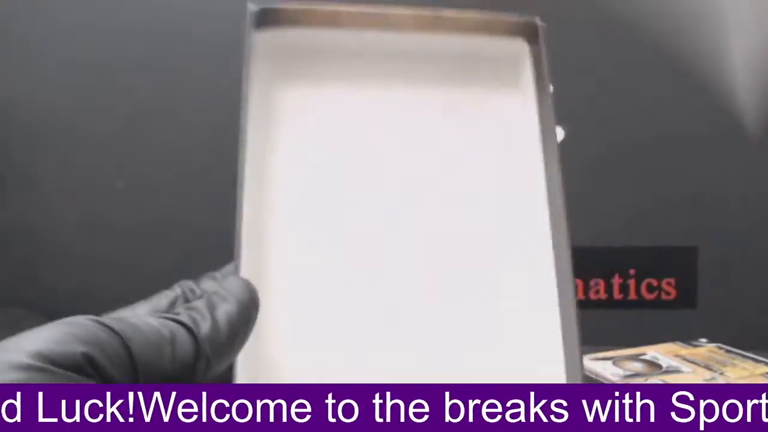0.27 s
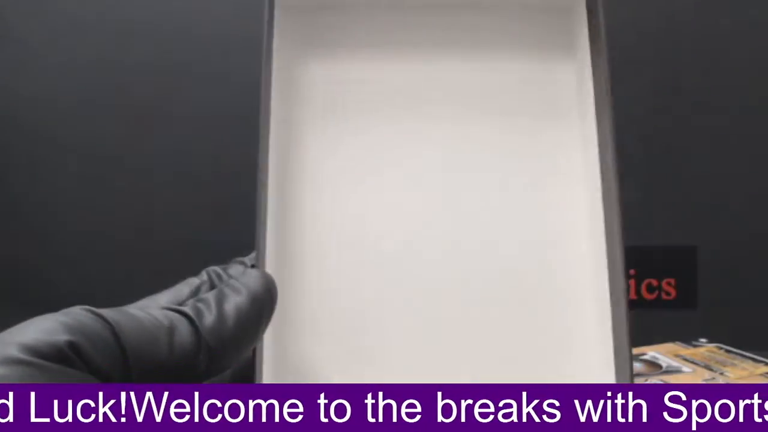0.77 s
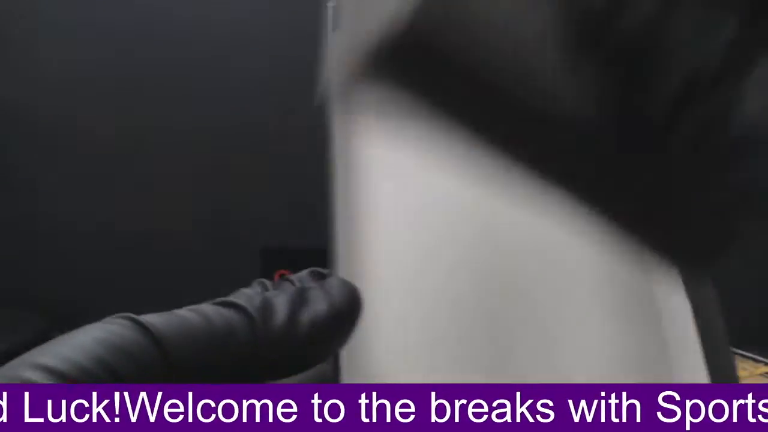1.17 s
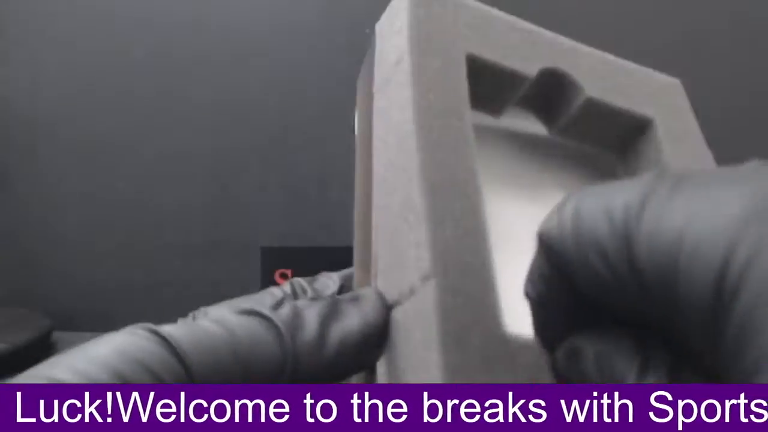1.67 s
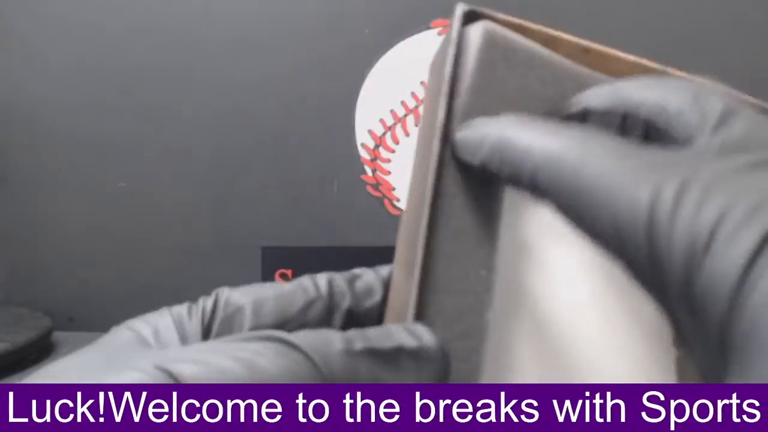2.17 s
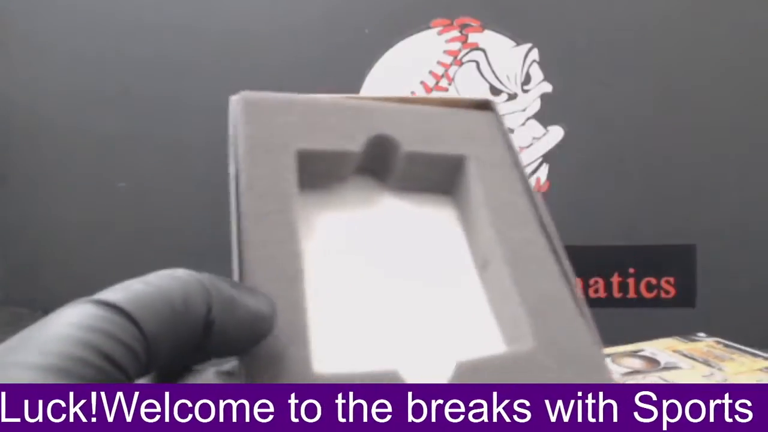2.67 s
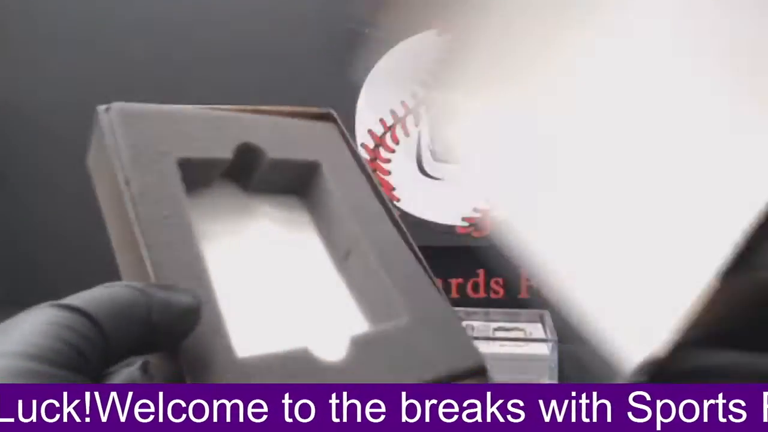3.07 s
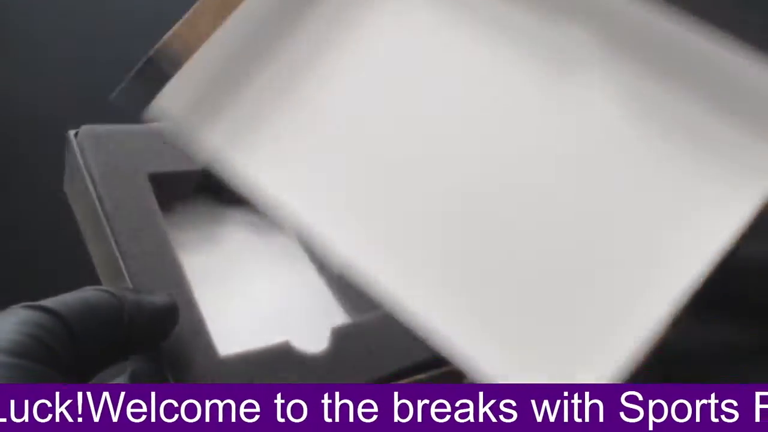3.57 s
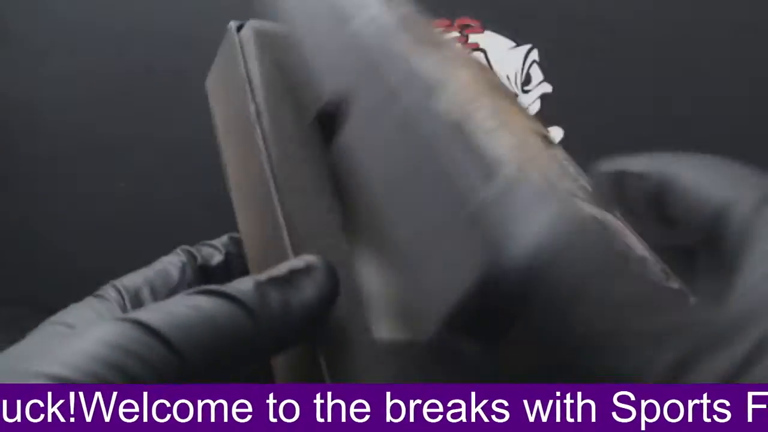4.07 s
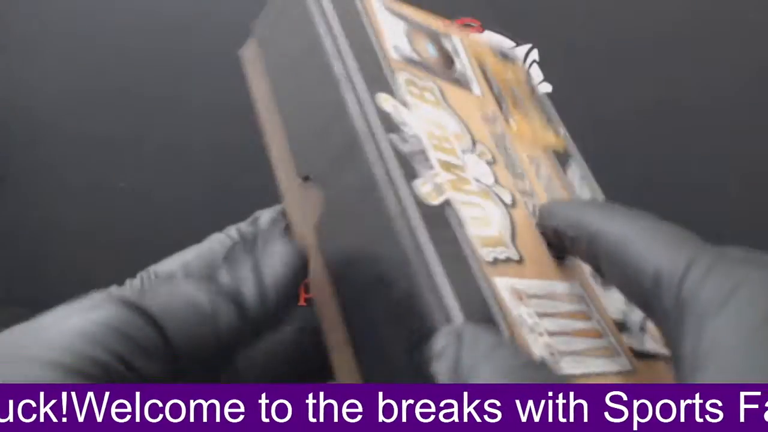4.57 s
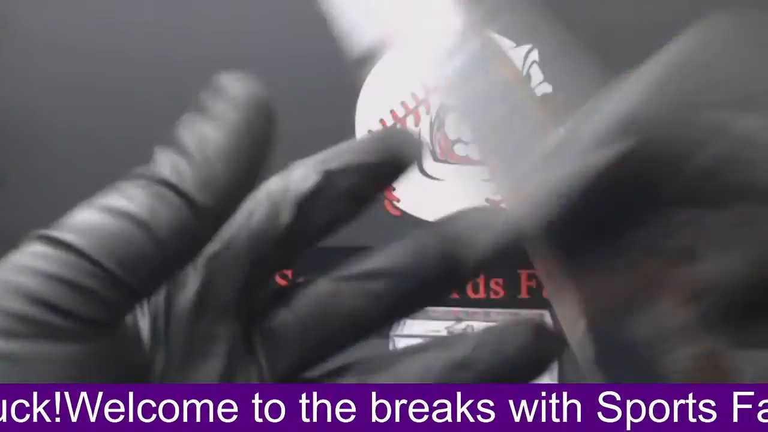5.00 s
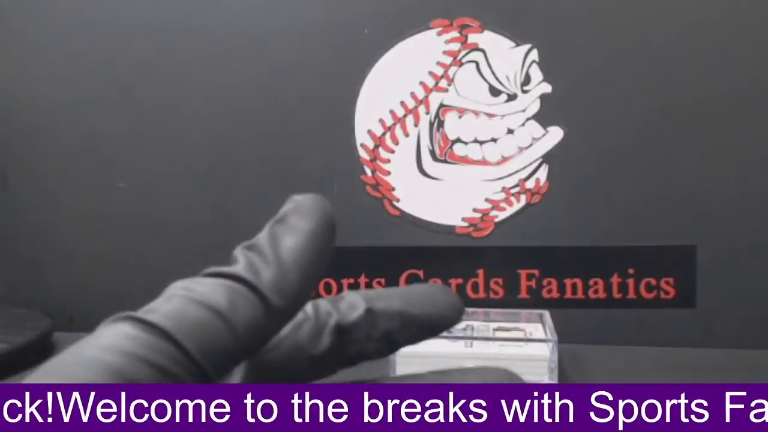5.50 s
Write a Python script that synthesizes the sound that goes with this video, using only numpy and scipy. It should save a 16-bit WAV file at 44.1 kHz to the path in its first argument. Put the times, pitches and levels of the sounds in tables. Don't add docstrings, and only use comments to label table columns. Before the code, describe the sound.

Dry foam and cardboard friction starts at once, fades to faint hum, then returns with a small squeak, clicks and boxy thuds. A lid is dragged and brought over with a sharp scrape and soft bumps. It slaps hard onto the box, rattles, rubs and is forced down with low shuddering thumps, then almost silence. Close microphone, small room, louder on the left.

```python
import sys
import numpy as np
from scipy import signal
from scipy.fft import rfft, irfft, next_fast_len
from scipy.io import wavfile
from scipy.ndimage import uniform_filter1d, map_coordinates

SR = 44100
rng = np.random.default_rng(int(sys.argv[2]) if len(sys.argv) > 2 else 0)


def log_audio(samples):
    frames = np.atleast_2d(samples).T
    limited = np.clip(frames, -1, 1)
    pcm = np.round(limited * 32767).astype(np.int16)
    wavfile.write(sys.argv[1], SR, pcm)


def nominal_scale(level):
    x = np.asarray(level, float) / 20
    return 10 ** x


N = 253126
T = np.arange(N) / SR
LID_ON_S = 3.885

# centre_hz, width_hz, level_db
OPEN_CAVITY = [(200, 104, -7.5), (282, 34.8, 3.5), (382.3, 40, -4.5), (463.68, 76, -13)]
# centre_hz, width_hz, level_db
SHUT_CAVITY = [(221, 13, 4.5), (291, 47, 5), (335, 71.1, 5), (395.88, 41.6, 0.5), (447.7, 23.4, 3),
               (534, 117, -15.5)]


def unit(x):
    return x / np.sqrt(np.mean(x ** 2) + 1e-20)


def along(points, hz):
    f, v = np.transpose(points)
    return np.interp(np.log(hz + 1), np.log(f + 1), v)


def wobble(rate_hz):
    knots = rng.standard_normal(int(N / SR * 200) + 4)
    return map_coordinates(knots, [T * min(rate_hz, 199)])


def filtered(x, response):
    m = next_fast_len(N + SR // 2)
    return irfft(rfft(x, m) * response(np.fft.rfftfreq(m, 1 / SR)), m)[..., :N]


def modes(table):
    def response(f):
        total = 0
        for k, (centre_hz, width_hz, db) in enumerate(table):
            loss = 1j * f * width_hz
            total = total + (-1) ** k * nominal_scale(db) * loss / (centre_hz * centre_hz - f * f + loss)
        return total
    return response


def grains(rate_hz, spread_db, smooth):
    size = nominal_scale(spread_db * np.minimum(rng.exponential(size=N), 3))
    slips = (rng.random(N) < rate_hz / SR) * rng.standard_normal(N) * size
    share = np.clip(smooth, 0, 1)
    return np.sqrt(1 - share) * unit(slips) + np.sqrt(share) * rng.standard_normal(N)


def rung(table, envelope, force):
    response = modes(table)
    gain = np.sqrt(np.mean(np.abs(response(np.linspace(1, SR / 2, num=8192))) ** 2))
    return filtered(envelope * force, response) / gain


def struck(table, blows):
    one = irfft(modes(table)(np.fft.rfftfreq(16384, 1 / SR)))
    return signal.fftconvolve(blows, one[:8192] / np.abs(one).max())[:N]


def stages():
    drag_s, up_s = 2.65, 3.1
    # centre_hz, width_hz, level_db
    tray = [(689, 107, -7), (955, 64, 3.5), (1400, 98, -11.5)]
    # centre_hz, width_hz, level_db
    corner = [(690, 60.2, 1), (940, 52, 2.5), (1320, 59, -5), (2050, 120, -17)]
    # centre_hz, width_hz, level_db
    panel = [(715, 20.7, 3.5), (909, 33, 3.5), (1200, 24, -8), (1471.1, 29, -5), (1930, 29, -6.5),
             (2100, 39, -18.5), (2470, 35, -10.5), (3130, 35, -11)]
    # centre_hz, width_hz, level_db
    shut = [(626, 120, -8.5), (741, 57, -0.5), (915, 48, -3), (995, 70, -3), (1214, 110, -10),
            (1430, 120, -12.5), (2000, 490, -17.5)]
    return ((tray, T < drag_s), (corner, (T >= drag_s) & (T < up_s)),
            (panel, (T >= up_s) & (T < LID_ON_S)), (shut, T >= LID_ON_S))


def strokes(table, db, slower=1):
    rounded = 1.24
    peak_s, rise_s, fall_s = np.transpose(table)[:3, :, None]
    t = np.arange(0, N / SR, 0.001)
    away = np.where(t < peak_s, (peak_s - t) / np.abs(rise_s), (t - peak_s) / np.abs(fall_s)) / slower
    return np.interp(T, t, np.linalg.norm(nominal_scale(db[:, None] - 10 * away ** rounded), axis=0))


def sliding(table, db):
    touch_s, lift_s = 0.0078, 0.0099
    start_s, length_s, _, gain_db = np.transpose(table)[:4, :, None]
    t = np.arange(0, N / SR, 0.001)
    edges = np.maximum(start_s - t, 0) / touch_s + np.maximum(t - start_s - length_s, 0) / lift_s
    swell_db = gain_db * np.clip((t - start_s) / length_s, 0, 1)
    return np.interp(T, t, np.linalg.norm(nominal_scale(db[:, None] + swell_db - 10 * edges), axis=0))


def patchy(x, patchy_db, colour):
    hz, s, z = signal.stft(x, SR, nperseg=512)
    field = uniform_filter1d(uniform_filter1d(rng.standard_normal(z.shape), 5, 0), 7, 1)
    z = z * colour(hz[:, None], s) * nominal_scale(patchy_db * unit(field))
    return unit(signal.istft(z, SR, nperseg=512)[1][:N])


def room_tone():
    # freq_hz, level_db
    quiet = [(12, -35.5), (20, 5), (89, -12.5), (124, -11), (253, -28.5), (370, -22.5), (502, -32.5),
             (541, -32), (1570, -35), (2080, -49.5), (7770, -49.5), (8600, -40), (11200, -86.5),
             (18900, -120)]
    # freq_hz, level_db
    hum_tones = [(26.9, -66), (118.4, -63.5), (376.8, -84), (1200, -91.5), (1599, -89.5), (1798, -89),
                 (3198, -98.5), (6998, -97), (7499, -100), (8000, -92)]
    quiet_db = -53
    air = filtered(rng.standard_normal((2, N)), lambda hz: nominal_scale(along(quiet, hz)))
    air = unit(air[0]) + [[0.33], [-0.33]] * unit(air[1])
    swell, drift = wobble(3.0), wobble(17)
    hum = np.zeros(N)
    for hz, db in hum_tones:
        hum += nominal_scale(db + 5.0 + 0.31 * swell) * np.sin(2 * np.pi * hz * T + 0.4 * drift)
    return (nominal_scale(quiet_db - 3.0 + 0.28 * wobble(2.1)) * air + hum) * nominal_scale([[3.2], [-3.8]])


def surface():
    # start_s, length_s, hiss_db, gain_by_lift_db, scrape_rel_db
    foam_slides = [(0, 0.1926, -57, -2, 5.5), (0.215, 0.025, -54.5, -5.5, 6.5), (0.25, 0.15, -72, -7.5, 1),
                   (0.957, .19, -80, 15, 1.5), (1.111, 0.2, -71, -16, 8.5), (1.43, 0.062, -66, -12, 2.5),
                   (1.512, 0.074, -77, 10.5, 10), (1.773, 0.14, -55, -6.5, 6), (1.944, 0.11, -69.5, 2.5, 7),
                   (2.074, 0.095, -61, 7, 7), (2.176, 0.077, -70, 1.5, 9.5), (2.29, 0.0897, -71.5, 13.5, 7),
                   (2.39, 0.44, -74, -4, -1)]
    # start_s, length_s, hiss_db, gain_by_lift_db, scrape_rel_db
    lid_slides = [(2.797, 0.074, -70.5, 0.5, 15), (2.9, 0.16, -74.5, 9.5, -1.5),
                  (3.036, 0.069, -60, -11.5, -3), (3.152, 0.067, -61, -2, 12), (3.215, .022, -66, -2, 14.5),
                  (3.25, 0.074, -74.5, -6, 9), (3.62, 0.05486, -76, 3.5, 1.5),
                  (3.73, 0.08087, -73, 4, -1.5), (3.906, 0.0869, -67.5, -5.5, 12),
                  (3.999, 0.11089, -62, 7.5, 9.5), (4.12, 0.075, -59, -4.5, 9), (4.197, 0.063, -52, -18, 1),
                  (4.274, 0.08219, -65.5, 12, 11.5), (4.35, 0.058, -52.5, -3, 4.5),
                  (4.42, 0.062, -51.5, 4, 2.5), (4.498, 0.18, -58.5, 2.5, 9.5), (4.668, 0.15, -50.5, 7, -2),
                  (4.839, 0.0637, -54.5, -16.5, -8), (4.91, 0.63746, -74.5, -1.5, 1.5),
                  (5.616, 0.10404, -84.5, -7.5, 16)]
    # time_s, freq_hz
    contact = [(.1, 2130), (.19, 2200), (.225, 3070), (.4, 1710), (1.13, 2978), (1.3, 2050), (2.84, 2200),
               (3.18, 1696), (3.7, 2764), (4.0, 1900), (4.11, 3036), (4.34, 1900), (4.5, 2190), (5.7, 1660)]
    # freq_hz, level_db
    scuff = [(1760, -33.5), (3000, -6), (4120, -2), (4520, -7), (5940, -3.5), (7180, -8.5), (8600, -40),
             (11200, -59), (18900, -120)]
    # freq_hz, level_db
    scrape = [(900, -28.5), (1400, -7.5), (2100, -5), (3300, -6.5), (4500, -11.5), (7000, -23)]
    rest_hiss_db = -86.5

    slides = np.array(foam_slides + lid_slides)
    fine_gain = np.hypot(sliding(slides, slides[:, 2]), nominal_scale(rest_hiss_db))
    coarse_gain = np.hypot(sliding(slides, slides[:, 2] + slides[:, -1]), nominal_scale(rest_hiss_db + 5.5))
    contact_s, contact_hz = np.transpose(contact)

    def scrape_colour(hz, s):
        off = (hz - np.interp(s, contact_s, contact_hz)) / 180
        return nominal_scale(along(scrape, hz) + 6.2 / (1 + off ** 2))

    fine = patchy(grains(3000, spread_db=1.5, smooth=0.43), 2.8, lambda hz, s: nominal_scale(along(scuff, hz)))
    coarse = patchy(grains(1500, spread_db=0.0, smooth=0.47), 1.9, scrape_colour)
    grip = nominal_scale(2.0 * wobble(35))
    return grip * (nominal_scale(0.5) * fine_gain * fine + nominal_scale(0.56 * wobble(60)) * coarse_gain * coarse)


def rubbing():
    # peak_s, rise_s_per_10db, fall_s_per_10db, board_db, cavity_db
    foam_presses = [(.05, 0.3, 0.05, -57, -48), (.14, 0, .045, -54.5, -54.5),
                    (0.227, 0.2044, 0.02, -50.5, -53), (.98, -0.6, 0.7, -77, -75),
                    (1.09, -0.3, 0.7, -65, -61.5), (1.459, 0, 0.015, -57.5, -39),
                    (1.582, 0, 0.03, -56.5, -56.5), (1.775, -0.01, 0, -38.5, -42.5),
                    (1.9, 0.06, 0.25, -54, -52.5), (2.149, 0.006, -0.02, -46.5, -40.5),
                    (2.383, 0.12, -0.08, -51, -48.5)]
    # peak_s, rise_s_per_10db, fall_s_per_10db, board_db, cavity_db
    lid_presses = [(2.708, 0.01501, 0.024, -52, -56), (2.829, 0.028, 0.036, -42.5, -48),
                   (3.034, 0.012, 0.029, -52.5, -47.5), (3.19, 0.025, 0.029, -28.5, -39.5),
                   (3.3, 0.044, .07, -62, -54), (4.043, 0.0037, 0.077, -40.5, -38.5),
                   (4.129, .05, .03, -46, -40.5), (4.201, 0.019, 0.04833, -42, -43.5),
                   (4.301, 0.023, 0.12496, -44, -51.5), (4.501, 0.17, 0.34, -45.5, -48.5),
                   (4.635, 0.021, 0.051, -39.5, -31), (4.713, 0.054, 0.079, -35.5, -30),
                   (4.81, 0.11, 0.02427, -34.5, -30.5), (5.08, 0.076, 0.07996, -55.5, -51),
                   (5.616, .02, 0.037, -80, -55)]
    # peak_s, rise_s_per_10db, fall_s_per_10db, shake_db
    leans = [
        (1.45, -0.3, 0.6, -57.5),
        (2.164, 0, 0.1, -48),
        (2.72, 0.24, 0.4, -54),
        (3.7, 0.5, 1, -61),
        (4.045, 0, -0.77, -39.5),
        (4.372, 0.02, 0.72, -44.5),
        (4.694, 0.0464, 0.09, -28),
        (4.829, 0.03, 0.0647, -32),
    ]
    # centre_hz, width_hz, level_db
    desk = [(66, 28, -12), (149.4, 25.6, 2), (176.98, 42.7, -2.5)]
    rest_board_db, rest_cavity_db = -83.5, -65.5
    air_lingers = 1.45

    presses = np.array(foam_presses + lid_presses)
    board_gain = np.hypot(strokes(presses, presses[:, -2]), nominal_scale(rest_board_db))
    air_gain = np.hypot(strokes(presses, presses[:, -1], air_lingers), nominal_scale(rest_cavity_db))
    jerks = grains(130, spread_db=0.7, smooth=0.34)
    chatter = grains(700, spread_db=1.5, smooth=0.25)
    force = 0.79 * chatter + 0.55 * jerks
    boards = sum(rung(board, nominal_scale(-2.0) * board_gain * now, force) for board, now in stages())
    air = rung(OPEN_CAVITY, nominal_scale(-1.5) * air_gain * (T < LID_ON_S), jerks)
    air += rung(SHUT_CAVITY, air_gain * (T >= LID_ON_S), jerks)
    shake = nominal_scale(-3.5) * strokes(leans, np.array(leans)[:, -1])
    return boards + air + rung(desk, shake, jerks)


def catches():
    # start_s, length_s, pitch_hz, level_db
    caught = [(0.023, 0.048, 940, -51), (0.043, 0.05, 2241, -51), (0.106, 0.071, 960, -49.5),
              (.215, 0.034, 367, -44), (0.252, .04, 2989, -66), (.44, .12, 171, -56),
              (1.055, 0.01703, 934, -62), (1.112, .04, 925, -56.5), (1.433, 0.013, 2240, -53.5),
              (1.528, 0.019, 950, -54.5), (1.569, 0.02767, 1950, -55.5), (1.777, 0.021, 1938, -44),
              (2.095, 0.05, 2148, -50), (2.151, 0.0242, 2700, -48), (2.143, .02, 800, -50),
              (2.192, 0.023, 335, -43), (1.453, 0.019, 846, -51), (1.76, .04, 479, -53),
              (2.356, .04, 1950, -48), (2.365, 0.03, 2800, -52), (2.368, 0.029, 933, -48.5),
              (3.161, 0.041, 3166, -52), (3.195, 0.021, 1471, -45), (3.24, 0.053, 478, -58.5),
              (3.637, 0.056, 917, -66), (4.071, 0.075, 752, -34.5), (4.15, .045, 738, -49),
              (4.082, 0.054, 332, -36), (4.108, 0.042, 960, -44.5), (4.194, 0.033, 729, -42),
              (4.2, 0.034, 360.5, -36), (4.275, .06, 954, -43.5), (4.322, 0.042, 1850, -43),
              (4.334, 0.029, 2050, -45), (4.341, .025, 151, -39.5), (4.372, 0.019, 151, -39.5),
              (4.374, .03, 715, -41), (4.485, 0.026, 110, -45), (4.44, 0.092, 452.4, -41.5),
              (4.439, .025, 2030, -51)]
    rel_width = 0.08
    out, t = np.zeros(N + SR), np.arange(SR // 5) / SR
    for s, length_s, hz, db in caught:
        knots = np.broadcast_arrays([[0], [1]], t * rel_width * hz)
        waver = map_coordinates(rng.standard_normal((2, 200)), [*knots], order=1)
        tone = (1 + 0.35 * waver[0]) * np.sin(2 * np.pi * hz * t + 1.3 * waver[1])
        swell = np.sin(np.pi * np.clip(t / length_s, 0, 1))
        out[round(s * SR):][:len(t)] += nominal_scale(db + 2.0) * swell * tone
    return out[:N]


def knocks():
    # start_s, crack_db, panel_db, cavity_db, push_db
    contacts = [(0.2197, -53, -43.5, -31, -42.5), (1.4607, -56, -40, -31.5, -32.5),
                (1.7765, -44, -28.5, -36, -65), (1.787, -36, -42, -58, -59),
                (2.1668, -37, -38, -19.5, -25.5), (2.374, -46, -83, -46.5, -83),
                (2.706, -56, -50, -48, -28), (3.0335, -62, -36, -80, -66), (4.1987, -39, -26, -27, -31.5),
                (4.2782, -45, -29, -50, -46), (4.3761, -33.5, -28.5, -28, -29.5),
                (4.7771, -32.5, -20, -24, -26.5), (4.8294, -61, -25.5, -49, -37.5),
                (5.0896, -73.5, -55.5, -32.5, -49)]
    crack, panel, cavity, push = np.zeros((4, N + SR))
    t = np.arange(SR // 10) / SR
    rattle = nominal_scale(-60 * t / 0.021)
    rattle /= np.linalg.norm(rattle)
    thud = nominal_scale(-60 * t / 0.028) * np.sin(2 * np.pi * 105 * t) * (1 - np.exp(-t / 0.001))
    for s, crack_db, panel_db, cavity_db, push_db in contacts:
        at = slice(round(s * SR), round(s * SR) + len(t))
        noise = rng.standard_normal((3, len(t)))
        crack[at] += nominal_scale(crack_db + 1.0 - 60 * t / 0.027) * noise[0]
        panel[at] += nominal_scale(panel_db - 2.5) * rattle * noise[1]
        cavity[at] += nominal_scale(cavity_db - 4.0) * rattle * noise[2]
        push[at] += nominal_scale(push_db + 3.0) * thud
    crack, panel, cavity, push = crack[:N], panel[:N], cavity[:N], push[:N]
    crack = filtered(crack, modes([(2200, 1300, 8.5), (5500, 4600, -7.0)]))
    boards = sum(struck(board, now * panel) for board, now in stages())
    air = struck(OPEN_CAVITY, cavity * (T < LID_ON_S)) + struck(SHUT_CAVITY, cavity * (T >= LID_ON_S))
    return crack + boards + air + push


def ticks():
    # start_s, peak_db, pitch_hz, t60_s
    snaps = [(0.368, -63.5, 5500, 0.023), (0.228, -45, 3100, .02), (1.291, -52, 4800, 0.0076),
             (1.434, -55, 2300, 0.018), (1.662, -46, 2712, 0.014), (1.663, -50, 1674, 0.0122),
             (1.6713, -47.5, 1730, 0.022), (1.6964, -50.5, 1900, 0.02309), (1.902, -49, 2100, 0.01),
             (2.085, -53, 2900, .015), (2.113, -51, 3000, .012), (2.123, -52, 1600, .012),
             (2.152, -48, 3000, .015), (2.243, -49, 2250, 0.014), (2.278, -52, 4500, 0.011),
             (2.375, -47, 2480, 0.04275), (2.691, -60.5, 910, .025), (2.78, -55, 4500, .01),
             (2.799, -50.5, 1400, 0.04), (3.149, -57, 2000, 0.03363), (3.385, -64.5, 3126, 0.021),
             (4.99, -55, 1090, 0.0805), (4.198, -43.5, 1100, .02), (4.376, -45, 1700, 0.0148),
             (4.777, -36.5, 2000, 0.017), (4.826, -37, 1000, .02), (5.037, -56.5, 1000, .025),
             (5.615, -50, 1047, 0.082), (5.618, -55.5, 1630, 0.21)]
    out, t = np.zeros(N + SR), np.arange(SR // 16) / SR
    for s, db, hz, t60_s in snaps:
        snap = nominal_scale(-60 * t / max(t60_s, 0.003)) * (rng.standard_normal(len(t)) + 3.3 * (t == 0))
        band = signal.butter(2, [hz / 1.63, hz * 1.24], "band", fs=SR, output="sos")
        snap = signal.sosfilt(band, snap)
        out[round(s * SR):][:len(t)] += nominal_scale(db + 6.0) * snap / np.abs(snap).max()
    return out[:N]


def bumps():
    # start_s, peak_db, pitch_hz
    swings = [(0.405, -41.5, 153.5), (1.181, -49, 282), (1.226, -49.5, 282), (1.417, -42.5, 153),
              (1.816, -43, 275), (2.105, -45, 282), (2.421, -43, 148), (2.759, -45, 101), (3.387, -41, 155),
              (3.638, -42.5, 155), (3.68, -46, 181), (3.754, -43.5, 156), (3.821, -54.5, 141.4),
              (4.959, -46.5, 48.7), (5.378, -43.5, 150.6)]
    out, t = np.zeros(N + SR), np.arange(SR // 4) / SR
    for s, db, hz in swings:
        envelope = nominal_scale(db + 7.5 - 60 * t / 0.13) * (1 - np.exp(-t / 0.0057))
        out[round(s * SR):][:len(t)] += envelope * np.sin(2 * np.pi * hz * t)
    return out[:N]


def squeak():
    # time_s, level_db
    level = [
        (1.33, -66),
        (1.338, -47.5),
        (1.418, -51.5),
        (1.435, -85),
    ]
    # centre_hz, width_hz, level_db
    foam = [(910, 46, -3), (1560, 77.3, -3), (2300, 150, -2.5), (3340, 200, 6.5), (4260, 46, -3)]
    time_s, level_db = np.transpose(level)
    on = (T > time_s[0]) & (T < time_s[-1])
    envelope = on * nominal_scale(np.interp(T, time_s, level_db) - 4.0 + 0.93 * wobble(58.8))
    return rung(foam, envelope, grains(1300, spread_db=-3.0, smooth=0.46))


def slams():
    # (pitch_hz, level_db, t60_s)
    rings = [
        (3.8905, [(90.73, -44.5, 0.0175), (200, -13, 0.042), (335, -14, 0.05132), (587.5, -26, 0.034), (706, -25.5, 0.071), (901.5, -11.5, 0.05), (940, -36, 0.13), (1430, -23.5, 0.04), (2041, -30, 0.044)]),
        (3.926, [(345, -25.5, 0.13), (291.3, -41, 0.0861), (915, -39, 0.21)]),
        (3.9908, [(115, -20.5, 0.051), (299.3, -15, 0.096), (388, -16.5, 0.12), (562, -20.5, 0.051), (722.4, -14.5, 0.1), (745, -28, 0.29), (936, -15.5, 0.064), (1225, -25.5, 0.053), (1860, -30, 0.074)]),
        (4.0247, [(284.5, -20, 0.062), (397.1, -27.5, 0.1), (915, -15.5, 0.046), (995, -30.5, 0.076)]),
    ]
    # start_s, level_db, t60_s
    slaps = [
        (3.8915, -19.5, 0.027),
        (3.991, -19.5, 0.031),
        (4.0261, -32.5, 0.026),
    ]
    waver_rad, waver_rate_hz = 0.6, 45
    out, crack = np.zeros((2, N + SR))
    t = np.arange(SR // 3) / SR
    for s, ring in rings:
        knots = np.broadcast_arrays(np.arange(16)[:, None], t * waver_rate_hz)
        waver = map_coordinates(rng.standard_normal((16, 40)), [*knots], order=1)
        swing = np.zeros(len(t))
        for k, (hz, db, t60_s) in enumerate(ring):
            phase = 2 * np.pi * hz * t + waver_rad * (waver[k] - waver[k, 0])
            swing -= (-1) ** k * nominal_scale(db - 60 * t / t60_s) * np.sin(phase)
        out[round(s * SR):][:len(t)] += swing * (1 - np.exp(-t / 0.0006))
    for s, db, t60_s in slaps:
        crack[round(s * SR):][:len(t)] += nominal_scale(db - 60 * t / t60_s) * rng.standard_normal(len(t))
    return out[:N] + filtered(crack[:N], modes([(1900, 1590, 6.0), (4500, 1900, -5.0)]))


def sinking():
    # start_s, peak_db
    slips = [(4.604, -28), (4.632, -18.5), (4.645, -19.5), (4.656, -16.5), (4.677, -16), (4.6873, -16),
             (4.694, -19.5), (4.707, -25), (4.713, -13), (4.720, -21), (4.730, -26.5), (4.741, -20.5),
             (4.747, -13.5), (4.760, -23.5), (4.768, -24), (4.788, -27), (4.805, -24.5), (4.815, -24.5),
             (4.823, -23), (4.829, -22)]
    # pitch_hz, level_db, t60_s
    seat = [(166.7, -4.5, 0.049), (286.17, -6.5, .04), (396, -10.5, .035), (725, -19.5, 0.027),
            (960, -19, .035)]
    slip_s = 0.0014
    blows, t = np.zeros(N), np.arange(SR // 8) / SR
    for s, db in slips:
        blows[round(s * SR)] = -nominal_scale(db + 1.3)
    push = np.exp(-(np.arange(-200, 200) / (SR * slip_s / 4)) ** 2)
    answer = sum(nominal_scale(db - 60 * t / t60_s) * np.cos(2 * np.pi * hz * t) for hz, db, t60_s in seat)
    return signal.fftconvolve(np.convolve(blows, push / push.sum(), "same"), answer)[:N]


def wall_tail(seconds):
    # freq_hz, t60_s
    walls = [(150, 0.17), (1000, 0.29), (8000, 0.019)]
    hz, t, z = signal.stft(rng.standard_normal((2, round(seconds * SR))), SR, nperseg=256)
    h = signal.istft(z * nominal_scale(-60 * t / along(walls, hz)[:, None]), SR, nperseg=256)[1]
    return h / np.linalg.norm(h, axis=1, keepdims=True)


def pair(x):
    # freq_hz, left_right_likeness
    alike = [(60, 1), (160, 1), (430, 0.97), (1150, 0.84), (2200, 0.41), (4000, 0.43), (8260, 0.77)]
    # freq_hz, level_db
    left_over_right = [(40, 9.5), (200, 7.5), (500, 7.5), (1500, 7), (3000, 5.5), (6000, 4), (8300, 5)]
    z = signal.stft(x, nperseg=512)[2]
    drift = rng.standard_normal((2, *z.shape))
    drift = uniform_filter1d(uniform_filter1d(drift, size=14, axis=1), size=7, axis=2)
    scattered = signal.istft(z * np.exp(1j * np.arctan2(*drift)), nperseg=512)[1]
    scattered = np.pad(scattered, (128, 0))[:N]

    def far_response(hz):
        turn = np.arccos(np.clip(along(alike, hz), 0, 1))
        return nominal_scale(3.0 - along(left_over_right, hz)) * [np.cos(turn), np.sin(turn)]

    direct, diffuse = filtered(np.array([x, scattered]), far_response)
    return np.array([nominal_scale(3.0) * x, direct + diffuse])


def scene():
    box = surface() + rubbing() + catches() + knocks() + ticks() + bumps()
    box = box + squeak() + nominal_scale(2.5) * slams() + sinking()
    late = np.pad(box, (400, 0))[None]
    echo = signal.fftconvolve(late, wall_tail(0.4), axes=1)[:, :N]
    return pair(box) + nominal_scale([[-15], [-22]]) * echo + room_tone()


def top_cut(x):
    return signal.sosfilt(signal.butter(12, 8860, fs=SR, output="sos"), x)


def record(dry):
    ceiling, knee = 0.28656, 4.5
    clipped = dry / (1 + np.abs(dry / ceiling) ** knee) ** (1 / knee)
    mix = filtered(clipped, lambda hz: 1 / (1 + (hz / 8100) ** 40))
    return top_cut(mix)


dry = scene()
out = record(dry)
log_audio(out)
```